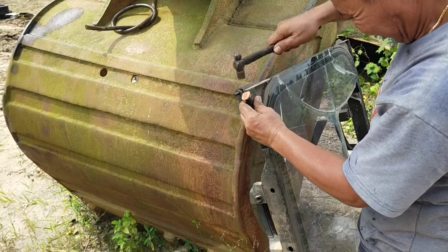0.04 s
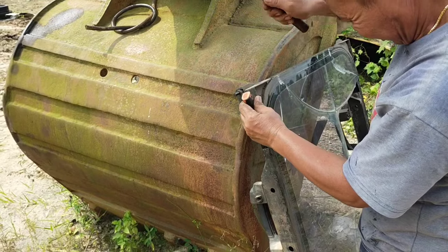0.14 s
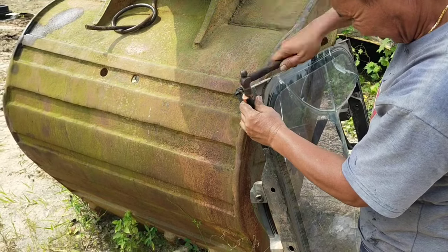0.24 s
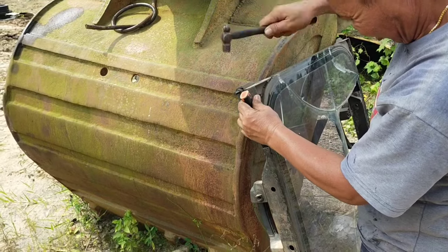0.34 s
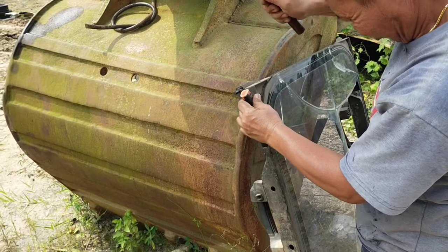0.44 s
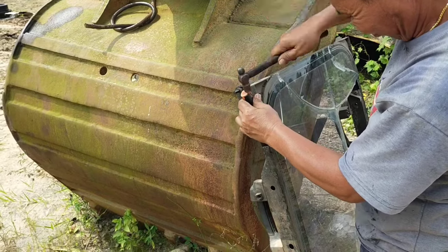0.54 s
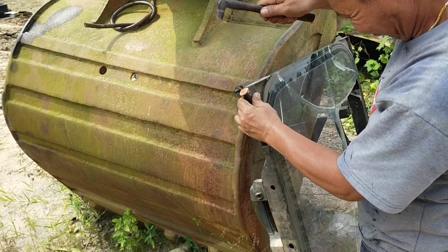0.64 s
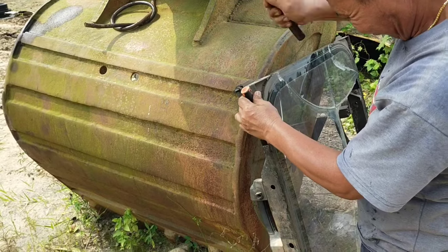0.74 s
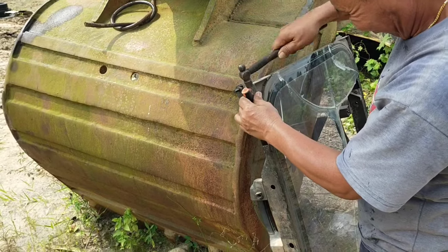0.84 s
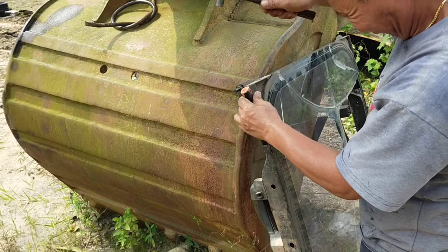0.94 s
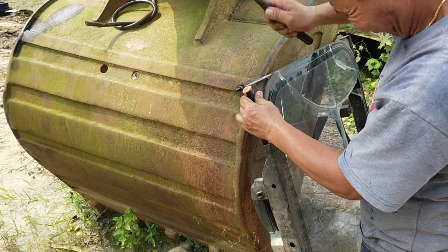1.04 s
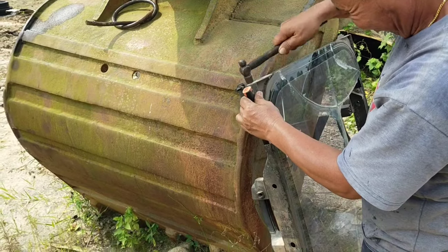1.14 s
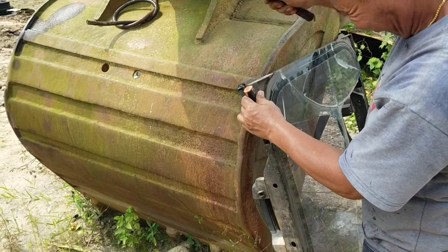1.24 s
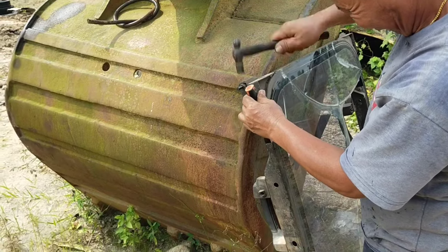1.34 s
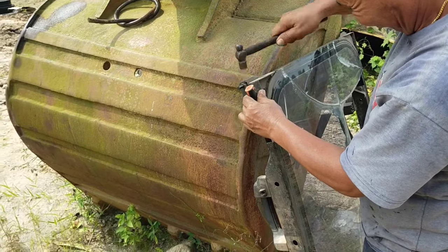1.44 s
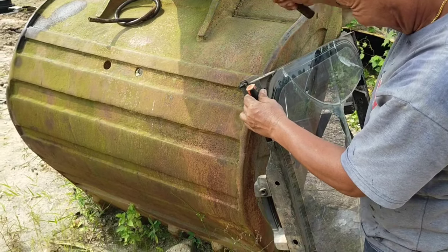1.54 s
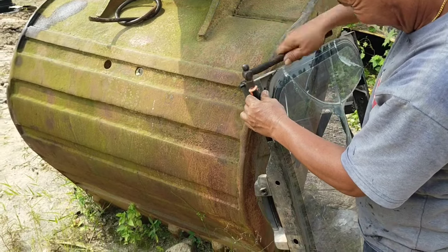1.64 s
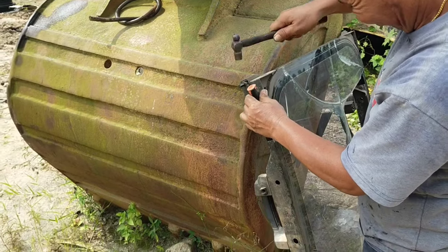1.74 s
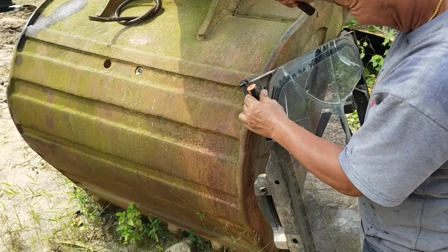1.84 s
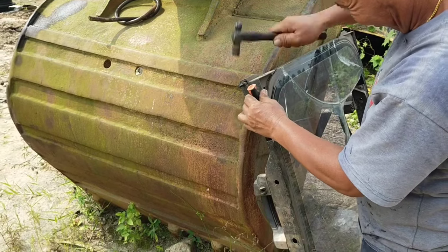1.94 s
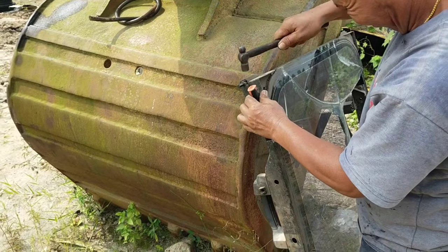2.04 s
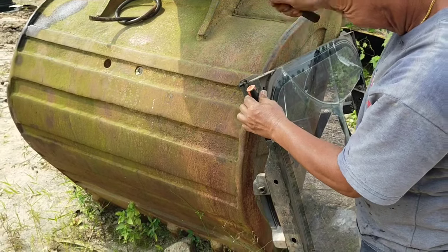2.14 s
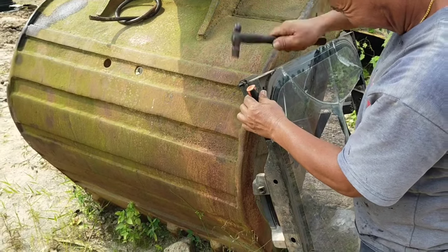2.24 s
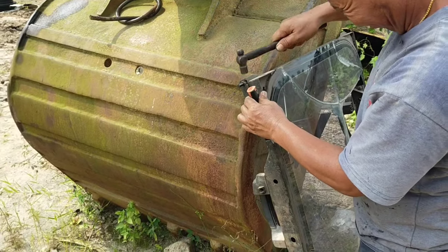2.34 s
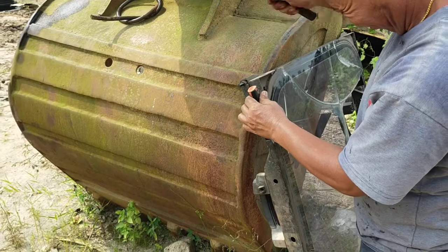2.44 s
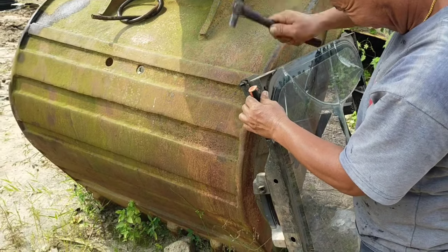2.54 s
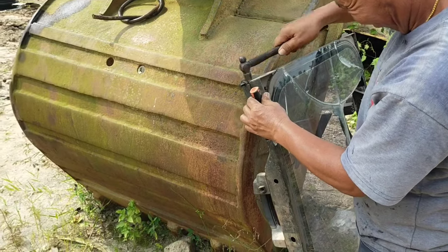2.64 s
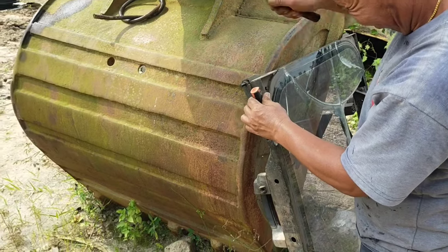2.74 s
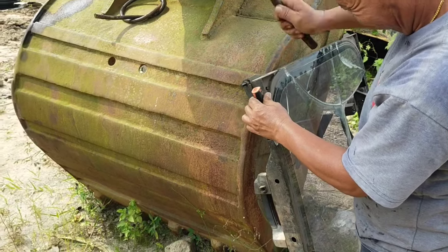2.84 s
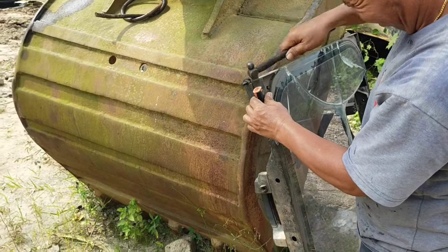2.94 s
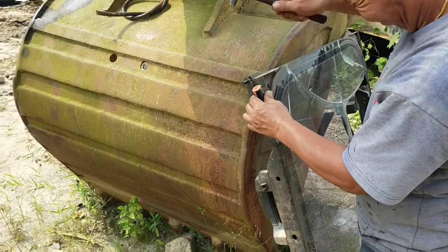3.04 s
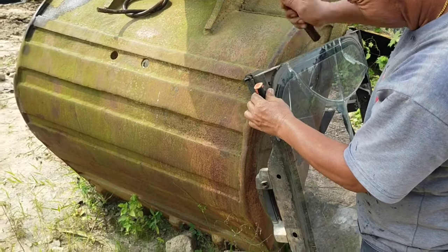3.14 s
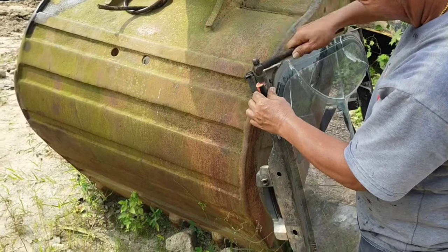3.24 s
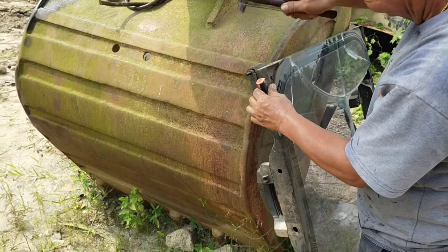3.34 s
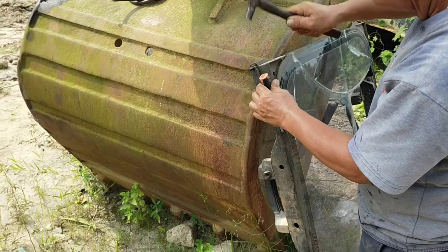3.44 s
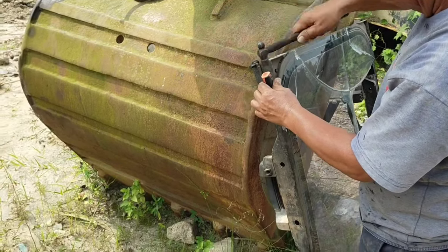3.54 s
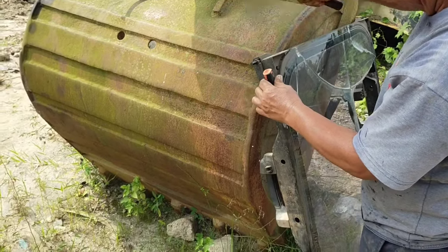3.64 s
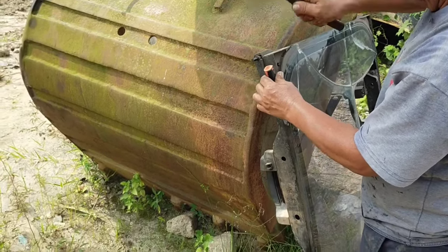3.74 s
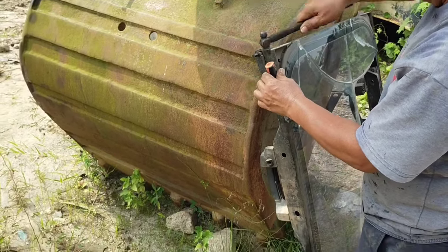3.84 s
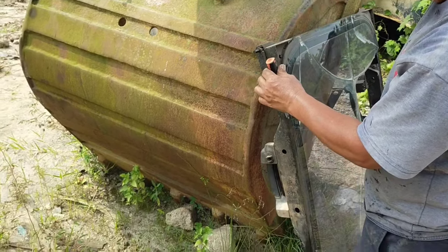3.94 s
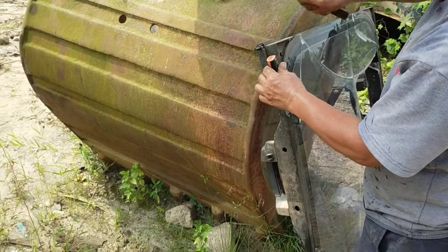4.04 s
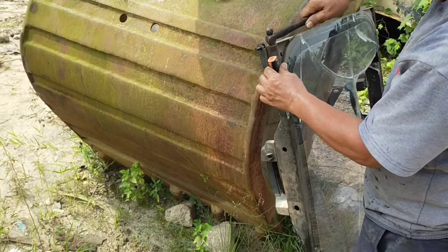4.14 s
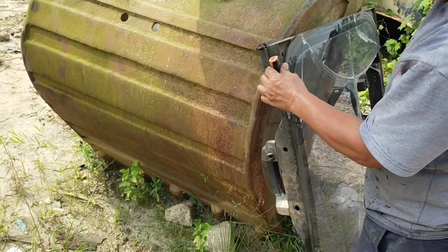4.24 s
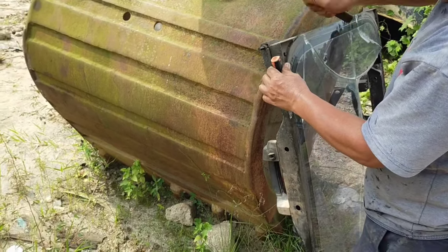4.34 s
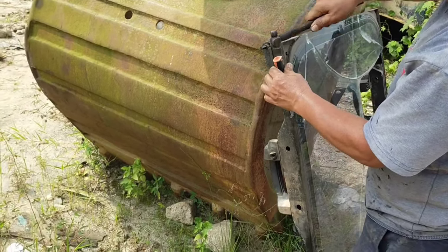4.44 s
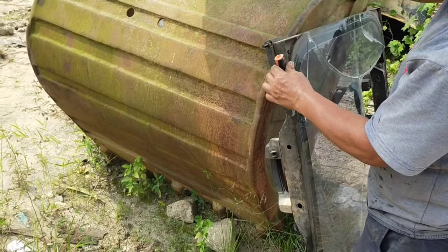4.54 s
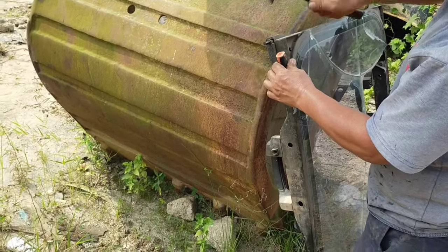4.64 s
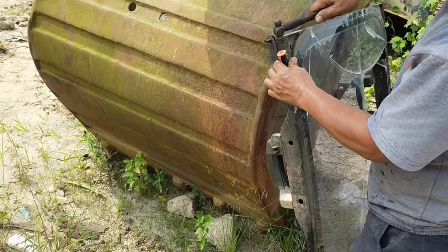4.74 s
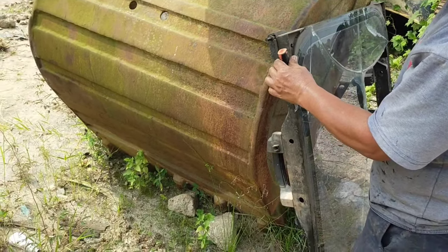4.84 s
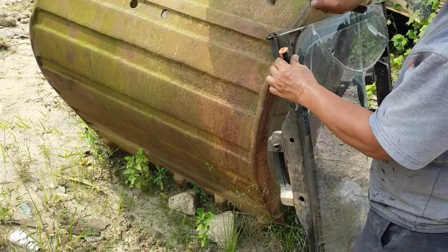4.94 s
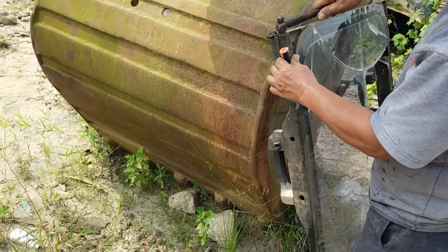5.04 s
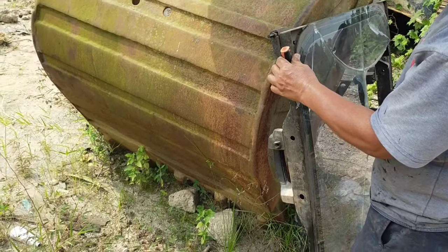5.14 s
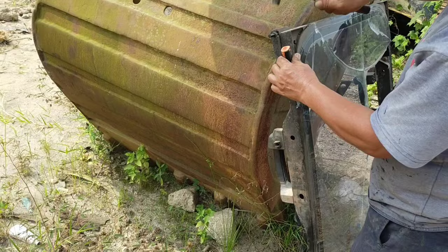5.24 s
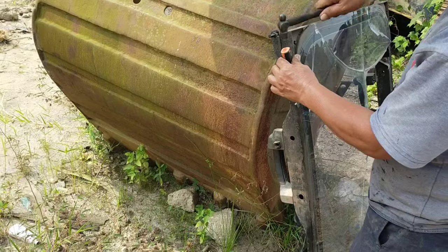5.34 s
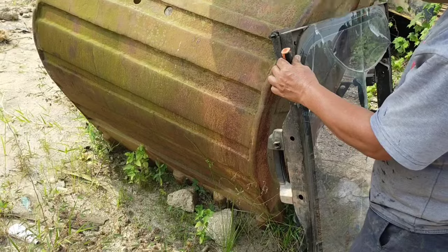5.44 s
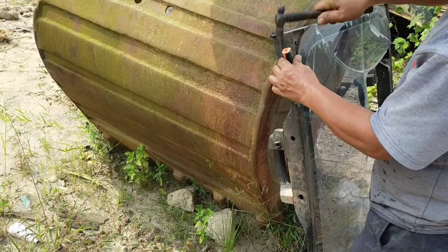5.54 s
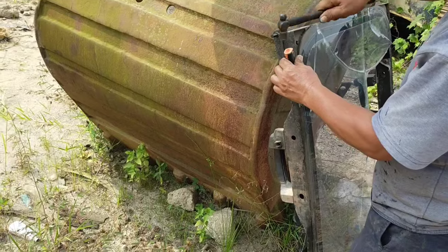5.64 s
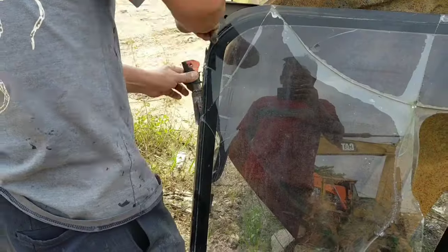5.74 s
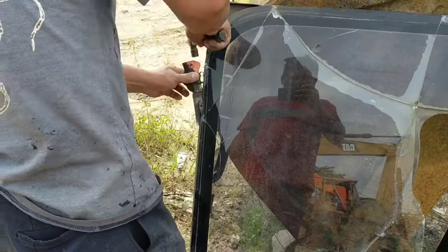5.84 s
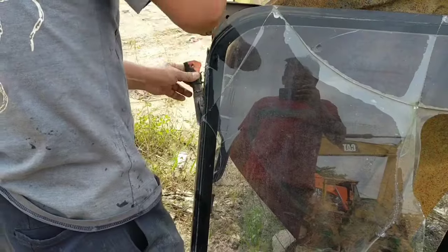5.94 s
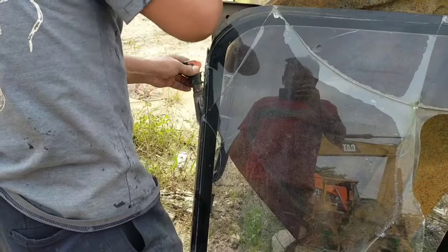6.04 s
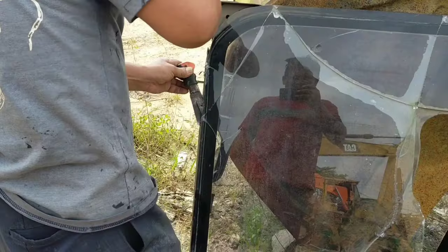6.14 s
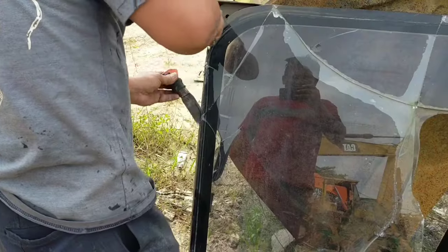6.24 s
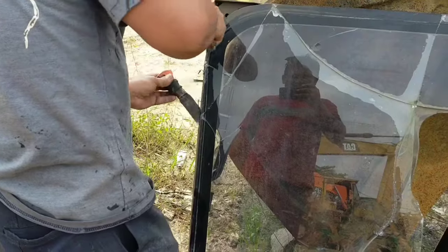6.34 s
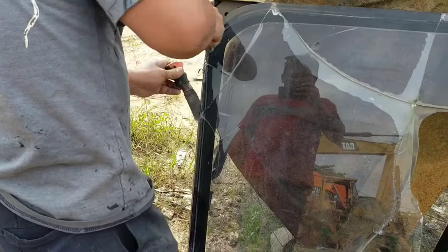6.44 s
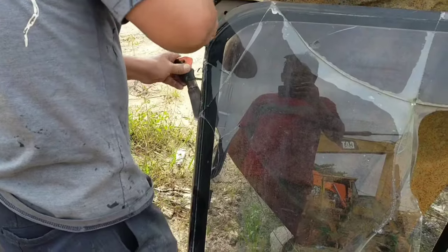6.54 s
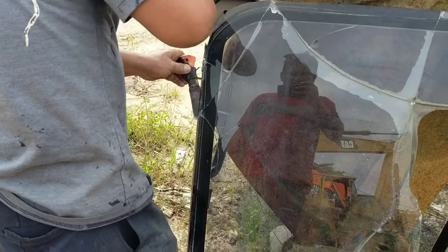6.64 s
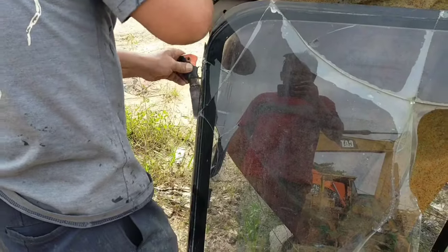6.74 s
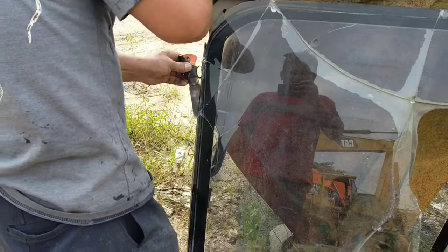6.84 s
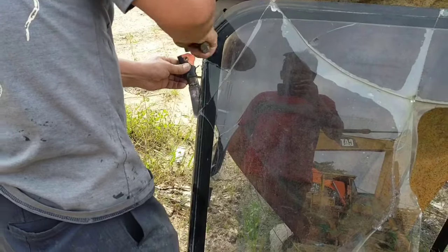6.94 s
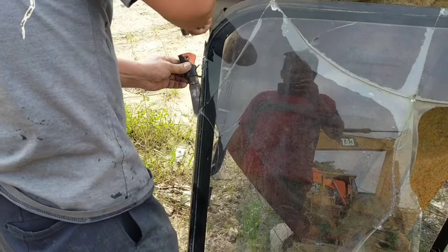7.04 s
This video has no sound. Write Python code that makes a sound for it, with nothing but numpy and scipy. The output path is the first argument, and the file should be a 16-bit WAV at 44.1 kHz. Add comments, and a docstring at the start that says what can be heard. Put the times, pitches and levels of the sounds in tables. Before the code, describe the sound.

Bright, dry metal hammer knocks, about three a second, ring briefly while a one-cylinder engine putters low behind; near the end the knocking stops.

```python
"""Outdoors, a small hammer taps a hand-held chisel against the steel window frame of a machine cab,
a little over three blows a second. Impact noise makes the crack, damped modes the brief ring of the frame,
decaying noise the panels and hull, and delays the far walls. A one-cylinder engine idles some way off as
firing pulses through resonances, with clatter of shaped noise that changes at a cut near the end. Low noise
under a gust envelope is wind at the microphone, and the recorder's gain control ducks at the blows."""
import sys
import numpy as np
from scipy import signal
from scipy.fft import rfft, irfft, next_fast_len
from scipy.io import wavfile
from scipy.ndimage import uniform_filter1d, minimum_filter1d

SR = 44100
rng = np.random.default_rng(int(sys.argv[2]) if len(sys.argv) > 2 else 0)


def generate_wav(signal):
    """Clip the signal to [-1, 1] and save it as 16-bit WAV at the path in sys.argv[1]."""
    frames = np.transpose(np.atleast_2d(signal))
    scaled = np.clip(frames, -1, 1) * 32767
    pcm = np.round(scaled).astype(np.int16)
    wavfile.write(sys.argv[1], SR, pcm)


N = 312228
TIME = np.arange(N) / SR   # [s]


def from_db(db):
    """Level law: 20 dB is a tenfold amplitude."""
    return 10 ** (np.asarray(db) / 20)


def rms_one(x):
    """Normalisation: equal mean power, rms 1."""
    return x / np.sqrt(np.mean(x ** 2) + 1e-20)


def coloured(x, spectrum):
    """Spectral shaping: a gain at each frequency, falling 12 dB an octave below the first point; rms 1."""
    hz, db = np.transpose(spectrum)
    size = next_fast_len(N)
    f = np.fft.rfftfreq(size, 1 / SR) + 1e-6
    gain = from_db(np.interp(np.log(f), np.log(hz), db))
    gain = gain * np.minimum(f / hz[0], 1) ** 2
    return rms_one(irfft(rfft(x, size) * gain, size)[:N])


def noise(spectrum):
    """Random excitation: fresh Gaussian noise of a given spectrum, rms 1."""
    return coloured(rng.standard_normal(N), spectrum)


def clicks(times, heights):
    """Impulsive excitation: one single-sample click at each time."""
    out = np.zeros(N)
    out[np.clip(np.round(times * SR).astype(int), 0, N - 1)] = heights
    return out + 1e-18   # a trace of offset


def decay_per_sample(t60):
    """Exponential decay: the factor per sample that loses 60 dB in t60 seconds."""
    return from_db(-60 / (t60 * SR))


def ring(x, hz, t60):
    """Damped oscillator: a unit click sets a decaying sine of initial height 1 ringing."""
    r, w = decay_per_sample(t60), 2 * np.pi * hz / SR
    return signal.lfilter([0, np.sin(w)], [1, -2 * r * np.cos(w), r * r], x)


def resonance(x, hz, width_hz):
    """Resonance: a two-pole band-pass with gain 1 at its peak."""
    r, w = np.exp(-np.pi * width_hz / SR), 2 * np.pi * hz / SR
    return signal.lfilter(np.array([1, 0, -1]) * (1 - r * r) / 2, [1, -2 * r * np.cos(w), r * r], x)


def fade(x, t60):
    """Energy loss: each click starts an exponential decay of its own height."""
    return signal.lfilter([1], [1, -decay_per_sample(t60)], x)


def swell(s, db, rise_t60, fall_t60):
    """Build-up and decay: the difference of a slow and a fast exponential."""
    push = clicks(s, from_db(db))
    return fade(push, fall_t60) - fade(push, rise_t60)


def delayed(x, s):
    """Propagation delay: the same signal, s seconds later."""
    return np.interp(TIME - s, TIME, x, left=0)


def high_pass(x, edge_hz):
    """Bass loss: a second-order slope of 12 dB an octave."""
    return signal.sosfilt(signal.butter(2, edge_hz, "high", fs=SR, output="sos"), x)


FIRINGS_PER_S, FIRST_FIRING_S = 19.007, .0255
CUT_S, CUT_LAG_S = 5.76, .0075   # a cut: the engine beat resumes shifted and its clatter changes
BEFORE_CUT_DB, AFTER_CUT_DB = -48, -45.5   # rms level of the clatter, taken over the whole length
# exhaust resonances: (frequency [Hz], width [Hz], rms level [dB])
EXHAUST_RESONANCES = [(52, 50, -57), (106.6, 34.6, -49.5), (126.2, 37.6, -55), (208.8, 22.4, -56.5),
                      (329.3, 8, -71), (493.3, 11.3, -63.5), (621.4, 32, -66)]
# engine clatter before the cut: (frequency [Hz], relative density [dB per Hz])
BEFORE_CUT_SPECTRUM = [(200, -9.5), (320, 0), (500, -2.5), (750, -4), (1050, -3.5), (1600, -0.5),
                       (2100, -2.5), (2700, -5.5), (3300, -9), (4400, -17), (6000, -23), (7700, -19.5),
                       (10000, -28.5), (15500, -24.5)]
# engine clatter after the cut: (frequency [Hz], relative density [dB per Hz])
AFTER_CUT_SPECTRUM = [(250, -8), (400, -4), (600, -6), (800, -8), (1100, -3), (1500, -4), (2100, -2),
                      (2550, 0), (3150, -8), (3600, -10), (4600, -21), (5900, -27), (7500, -20),
                      (9300, -28), (15500, -26)]


def engine(uneven_db=0.15, repeat_share=0.29, throb_db=0.5, throb_phase=0.41, grain_db=0.97, grain_s=0.0087):
    """Pulse-excited resonance: exhaust puffs at each firing, with partly repeating noise of valves and gears."""
    lag_s = CUT_LAG_S * (TIME >= CUT_S)
    cycle = FIRINGS_PER_S * (TIME - FIRST_FIRING_S - lag_s)   # a steady idle
    fired = TIME[1:][np.diff(np.floor(cycle)) > 0]
    puffs = clicks(fired, from_db(uneven_db * rng.standard_normal(len(fired))))

    exhaust = 0
    for hz, width, db in EXHAUST_RESONANCES:
        pipe = ring(puffs, hz, np.log(1000) / (np.pi * width))
        exhaust = exhaust - from_db(db) * rms_one(resonance(pipe, hz, width))   # swells, then decays

    one_cycle = rng.standard_normal(int(np.median(np.diff(fired)) * SR))
    repeating = rms_one(signal.fftconvolve(puffs, one_cycle)[:N])
    fresh = rng.standard_normal(N)
    clatter = np.sqrt(repeat_share) * repeating + np.sqrt(1 - repeat_share) * fresh   # shares of power
    grain = rms_one(uniform_filter1d(rng.standard_normal(N), max(int(grain_s * SR), 1)))
    throb = np.cos(2 * np.pi * (cycle - throb_phase))
    clatter = clatter * from_db(throb_db * throb + grain_db * grain)

    before_cut = from_db(BEFORE_CUT_DB) * coloured(clatter, BEFORE_CUT_SPECTRUM)
    after_cut = from_db(AFTER_CUT_DB) * coloured(clatter, AFTER_CUT_SPECTRUM)
    return exhaust + np.where(TIME < CUT_S, before_cut, after_cut)


# strength of the wind, one long gust and a late puff: (time [s], relative level [dB])
GUSTS = [(0, -48.5), (1.25, -42), (1.47, -35), (1.8, -34), (2.3, -41.5), (2.7, -46), (3.6, -54),
         (5.55, -56.5), (5.73, -47.5), (5.9, -53.5), (7.08, -54)]
# rumble of air at the microphone port: (frequency [Hz], relative density [dB per Hz])
BUFFET_SPECTRUM = [(12, 3.5), (25, 9), (40, 1.5), (70, 1), (100, -5.5), (180, -13.5), (300, -22),
                   (700, -56)]


def wind(level_db=-0.5):
    """Turbulent pressure: low-frequency noise at the microphone port under a gust envelope."""
    gust_db = np.interp(TIME, *np.transpose(GUSTS))
    return from_db(level_db + gust_db) * noise(BUFFET_SPECTRUM)


# the chisel works its way along the frame: (time [s], seat [0-4])
CHISEL_SEATS = [(1.55, 0), (1.83, 1), (2.45, 1), (2.75, 1.7), (5.18, 2.1), (5.48, 2.8), (5.77, 3),
                (5.98, 4)]


def seat_at(s):
    """Moving excitation point: the seat of the chisel, interpolated over time."""
    return np.interp(s, *np.transpose(CHISEL_SEATS))


FRAME_DB = 1.0   # added to every mode of the frame
# hammer blows: (time [s], relative level [dB], echo level relative to the blow [dB])
HAMMER_BLOWS = [(0.1491, -19, -1), (0.4214, -20.5, -1.5), (0.6960, -20.5, 3), (0.9814, -19.5, 2),
                (1.2666, -18, -0.5), (1.5422, -18.5, -1.5), (1.8318, -20, -1.5), (2.1483, -19.5, -1.5),
                (2.4484, -21, -1.5), (2.7571, -22.5, -1.5), (3.0731, -19, -1), (3.3835, -18, -2),
                (3.6875, -20, -1), (3.9926, -21.5, -2), (4.2920, -21, 2), (4.5940, -20, -1),
                (4.8853, -22, 3), (5.183, -22.5, -1), (5.4820, -20, 0.5), (5.7735, -22, -1.5),
                (5.9879, -23.5, 4)]
# frame modes: (frequency [Hz], t60 [s], relative level [dB] with the chisel at seat 0, 1, 2, 3, 4)
FRAME_MODES = [(289, 0.22, -35, -39, -27, -23, -5), (957, 0.019, 0, 2, -2, -4, -3),
               (1057, 0.03, 1, 2, 1, -22, -12), (1129, 0.036, -6.5, -5, -0.5, -5.5, -19),
               (1383, 0.032, -8, -5, -19, 6.5, -4), (1540, 0.036, -1.5, 4, -6, -10, -25),
               (1646, 0.11, -18, -25, -3, -8, -4), (1816, 0.044, -29, -32, -16, -23, 5.5),
               (2070, 0.029, 0.5, -9, -26, -10, 4), (2206, 0.052, -9, -5, -0.5, 5.5, -9),
               (2383, 0.043, -31, -4, -6, -1, 6.5), (2584, 0.037, 7, 1.5, -1, -4, 2),
               (2860, 0.025, -0.5, 3, 6.5, -8, -1), (3100, 0.036, -2, 2, 0.5, 4.5, -16),
               (3256, 0.028, -14, -10, 3.5, 2, -22), (3890, 0.043, -11.5, -8, -9.5, -6, -7),
               (3980, 0.047, -10, -4.5, -5, -3, -6), (4270, 0.059, -11.5, -33, -8.5, -19, -8),
               (5276, 0.02, -7, -10, -10, -10, -19), (6370, 0.023, -11, -4.5, -12, -20, -27),
               (7580, 0.012, -5, -6, -7, -27, -10)]


def frame_ring(uneven_db=1.25, travel_s=0.00038):
    """Modal superposition: each blow rings damped modes, weighted by where the chisel sits."""
    s, blow_db, _ = np.transpose(HAMMER_BLOWS)
    seat = seat_at(s)
    out = np.zeros(N)
    for k, (hz, t60, *seat_db) in enumerate(FRAME_MODES):
        mode_db = np.interp(seat, np.arange(len(seat_db)), seat_db)
        uneven = uneven_db * rng.standard_normal(len(s))
        strength = from_db(FRAME_DB + blow_db + mode_db + uneven)
        arrival = s + travel_s * rng.random(len(s))   # bending waves reach the radiating sheet at different times
        out += (-1) ** k * ring(clicks(arrival, strength), hz, t60)   # neighbouring modes swing opposite ways
    return out


def sheet_noise(s, spectrum, same_share=0.45):
    """High modal density: a sheet rings as noise, partly the same after every blow and partly new."""
    response = rng.standard_normal(int(np.diff(s).min() * SR))
    same = signal.fftconvolve(clicks(s, 0.97), response)[:N]
    fresh = rng.standard_normal(N)
    return coloured(np.sqrt(same_share) * same + np.sqrt(1 - same_share) * fresh, spectrum)


CRACK_DB, CRACK_T60_S, CRACK_DB_PER_SEAT = 0.83, 0.029, -0.27   # the crack softens a little along the frame
UNEVEN_DB = 0.1   # no two blows land quite alike
SNAP_DB, SNAP_T60_S = -15, 0.05
HARD_SEAT, HARD_WIDTH_SEATS, HARD_SNAP_DB = 2.46, 1, 11   # where the chisel bites hardest and snaps brightest
# further along, more of each blow goes into the panels and the hull
PANELS_DB, PANELS_T60_S, PANELS_DB_PER_SEAT = -3.5, 0.12, 1.55
BOOM_DB, BOOM_T60_S, BOOM_DB_PER_SEAT = -19, .16, 3.5
# steel-on-steel crack: (frequency [Hz], relative density [dB per Hz])
CRACK_SPECTRUM = [(400, -10), (650, -15.5), (950, -4.5), (1300, -6), (2000, -5), (3000, -0.5), (4000, -6),
                  (4800, -9.5), (5700, -9.5), (7500, -6), (9500, -16), (16000, -23)]
# topmost snap of the crack: (frequency [Hz], relative density [dB per Hz])
SNAP_SPECTRUM = [(6000, -4.5), (9000, -3.5), (12500, -6), (16000, -5.5)]
# dense ringing of the cab panels: (frequency [Hz], relative density [dB per Hz])
PANEL_SPECTRUM = [(650, -15.5), (1050, -1.5), (1270, -5.5), (1650, -1), (2400, 2), (3200, -4),
                  (4200, -11.5), (5000, -20), (8000, -19.5), (11000, -23.5), (16000, -27)]
# boom of the hull: (frequency [Hz], relative density [dB per Hz])
BOOM_SPECTRUM = [(220, 0), (300, -6.5), (380, -6), (480, 0), (700, -8), (1100, -1), (3000, -56)]
# far walls: (delay [s], relative level [dB])
WALL_ECHOES = [(0.089, -28.5), (0.111, -34)]
# scattered return, and also the scrape of the chisel: (frequency [Hz], relative density [dB per Hz])
SCATTER_SPECTRUM = [(300, -22), (1000, -31), (1600, -0.5), (2500, 9), (3400, 0), (5000, -13.5), (7500, -13),
                    (10000, -25), (16000, -22)]


def hammer(spread_t60=0.03, scatter_db=-20.0, scatter_t60=0.18, scatter_rise_t60=0.014,
           rebound_db=-11, rebound_s=.0042, tick_db=-5.5, tick_t60=0.016):
    """Impact, radiation and reflection: crack, frame, panels and hull, then their return from the far walls."""
    s, blow_db, echo_db = np.transpose(HAMMER_BLOWS)
    seat = seat_at(s)
    crack_db = CRACK_DB_PER_SEAT * seat + UNEVEN_DB * rng.standard_normal(len(s))
    snap_db = HARD_SNAP_DB * np.exp(-((seat - HARD_SEAT) / HARD_WIDTH_SEATS) ** 2)
    panel_db = PANELS_DB_PER_SEAT * seat
    boom_db = BOOM_DB_PER_SEAT * seat
    again = s + rebound_s * rng.uniform(0.47, 1.3, len(s))   # the chisel bounces and bites a second time

    def contacts(level_db):
        """Repeated impact: the blow and its weaker rebound."""
        return clicks(s, from_db(level_db)) + clicks(again, from_db(level_db + rebound_db))

    crack = noise(CRACK_SPECTRUM) * fade(contacts(blow_db + crack_db + CRACK_DB), CRACK_T60_S)
    bite = contacts(blow_db + snap_db + SNAP_DB)
    snap_envelope = fade(bite, SNAP_T60_S) + from_db(tick_db) * fade(bite, tick_t60)   # sharpest at first touch
    snap = noise(SNAP_SPECTRUM) * snap_envelope
    panel_envelope = swell(s, blow_db + panel_db + PANELS_DB, spread_t60, PANELS_T60_S)
    panels = sheet_noise(s, PANEL_SPECTRUM) * panel_envelope
    boom = noise(BOOM_SPECTRUM) * swell(s, blow_db + boom_db + BOOM_DB, spread_t60, BOOM_T60_S)
    direct = high_pass(crack + snap + panels + frame_ring(), 490) + boom   # the narrow frame radiates little bass

    carry_db = np.interp(TIME, s, echo_db)
    outward = from_db(carry_db) * high_pass(direct, 2200)   # the treble carries across the yard
    walls = sum(from_db(level_db) * delayed(outward, lag) for lag, level_db in WALL_ECHOES)
    first_return = s + WALL_ECHOES[0][0]
    scatter_envelope = swell(first_return, blow_db + echo_db + scatter_db, scatter_rise_t60, scatter_t60)
    return direct + walls + noise(SCATTER_SPECTRUM) * scatter_envelope


# the hand shifts the chisel on the frame:
# (time [s], dull knock level [dB], knock frequency [Hz], relative scrape level [dB])
CHISEL_SHIFTS = [(1.648, -67, 400, -37.5), (6.185, -56, 393, -43), (6.472, -45.5, 414, -39),
                 (6.691, -47, 367, -61), (6.800, -49, 395, -55), (6.923, -64, 404, -58)]


def handling(knock_t60=0.14, scrape_t60=0.13, scrape_rise_t60=0.026):
    """Contact and friction: damped sines for faint knocks, swelling noise for scrapes of the shifted chisel."""
    s, _, _, scrape_db = np.transpose(CHISEL_SHIFTS)
    knocks = np.zeros(N)
    for at, knock_db, hz, _ in CHISEL_SHIFTS:
        knocks += ring(clicks(np.array([at]), from_db(knock_db)), hz, knock_t60)
    scrapes = noise(SCATTER_SPECTRUM) * swell(s, scrape_db, scrape_rise_t60, scrape_t60)
    return knocks + scrapes


def scene():
    """Linear superposition: engine, wind, hammering and handling add in one channel."""
    return (engine() + wind() + hammer() + handling())[None]


def gain_control(x, threshold_db=-17, deepest_db=6.0, ahead_s=0.007, hold_s=0.078, glide_s=0.0026,
                 release_db_per_s=253.0):
    """Dynamic compression: looks ahead, turns down for a peak, holds, then lets go at a steady rate."""
    over_db = np.clip(20 * np.log10(np.abs(x[0]) + 1e-9) - threshold_db, 0, deepest_db)
    held_db = -minimum_filter1d(-over_db, int((ahead_s + hold_s) * SR))   # running maximum, centred
    held_db = delayed(held_db, (hold_s - ahead_s) / 2)   # leaves only the look-ahead before the peak
    ramp_db = release_db_per_s * TIME
    cut_db = np.maximum.accumulate(held_db + ramp_db) - ramp_db
    return x * from_db(-uniform_filter1d(cut_db, max(int(glide_s * SR), 1)))


CUTOFF_HZ = 15750


def record(dry):
    """Recording chain: gain control, saturation that rounds the peaks, and a steep low-pass."""
    x = gain_control(dry)
    x = x / (1 + (x / .255) ** 4) ** .25   # bends towards a ceiling of .255
    return signal.sosfilt(signal.ellip(12, .1, 80, CUTOFF_HZ, fs=SR, output="sos"), x)


dry = scene()
out = record(dry)
generate_wav(out)
```